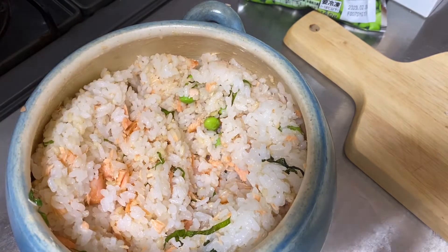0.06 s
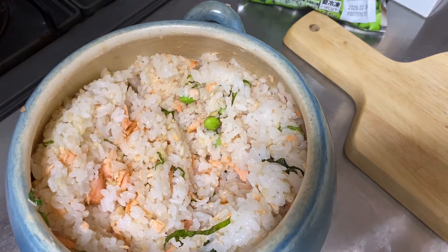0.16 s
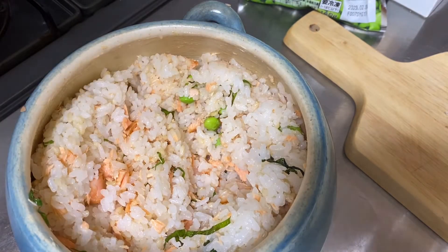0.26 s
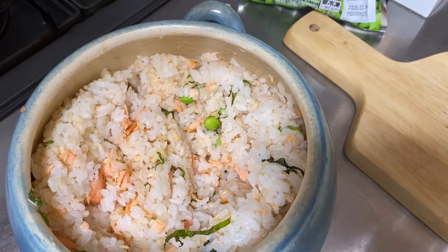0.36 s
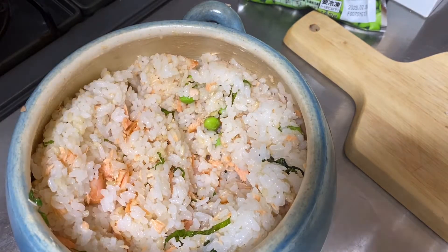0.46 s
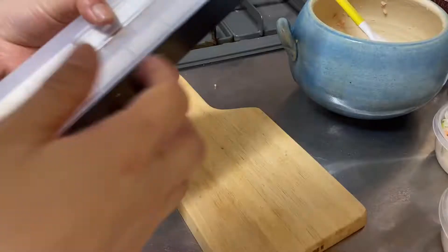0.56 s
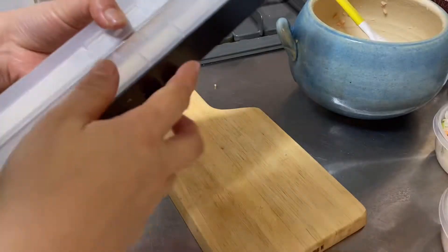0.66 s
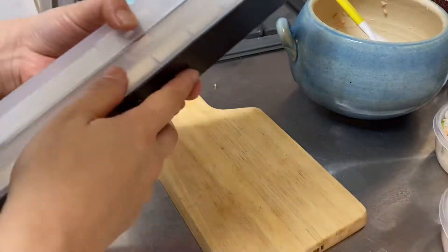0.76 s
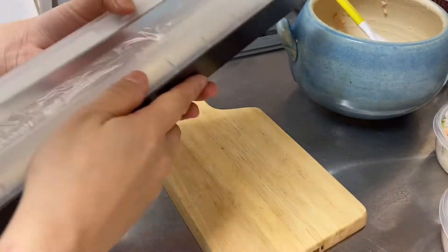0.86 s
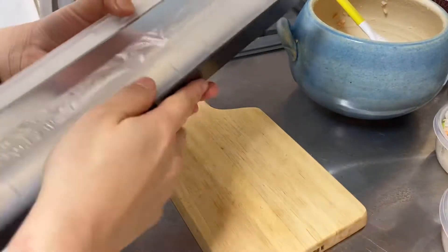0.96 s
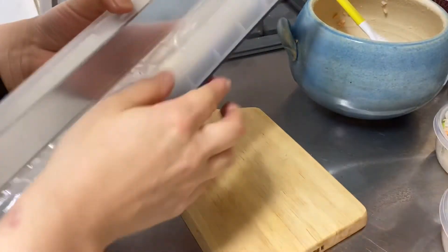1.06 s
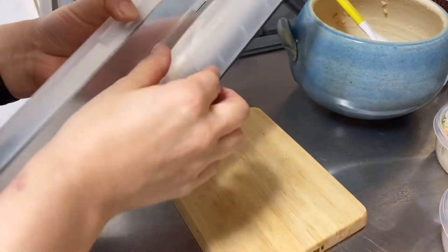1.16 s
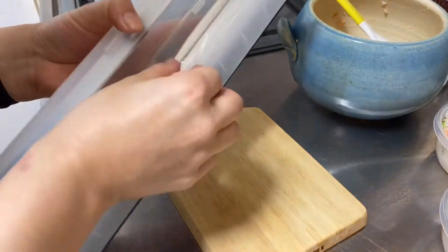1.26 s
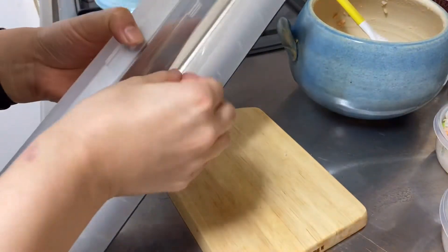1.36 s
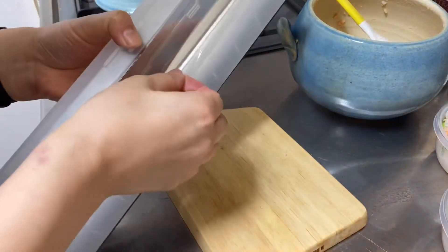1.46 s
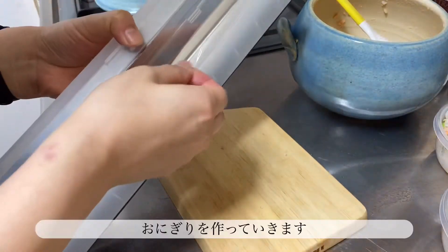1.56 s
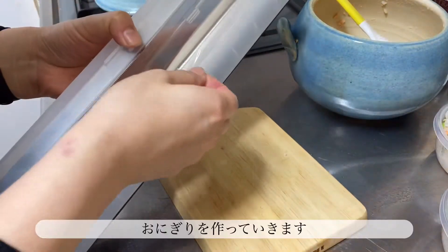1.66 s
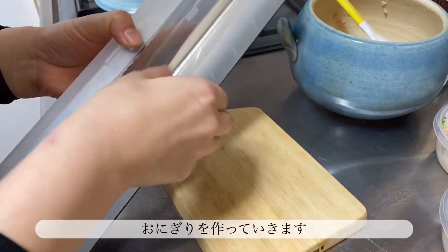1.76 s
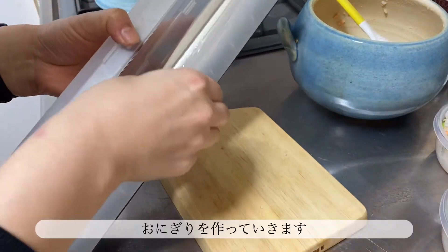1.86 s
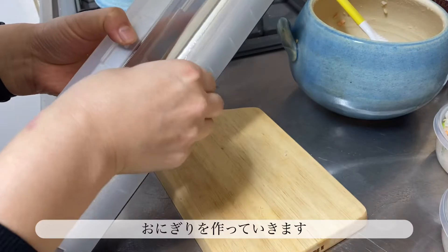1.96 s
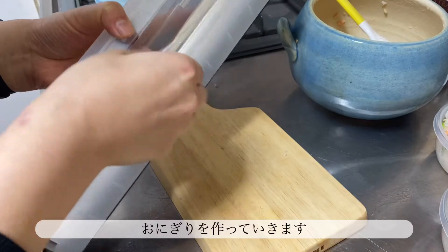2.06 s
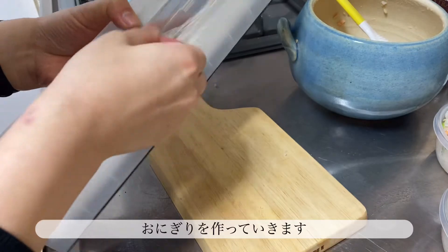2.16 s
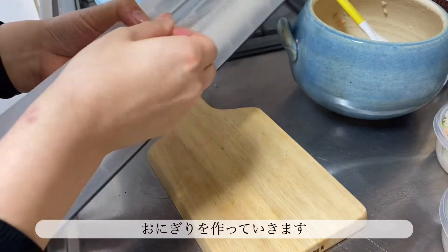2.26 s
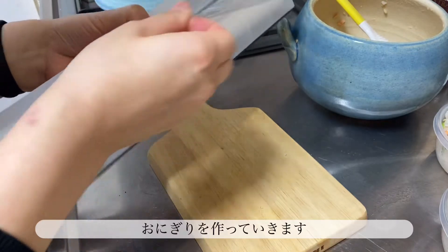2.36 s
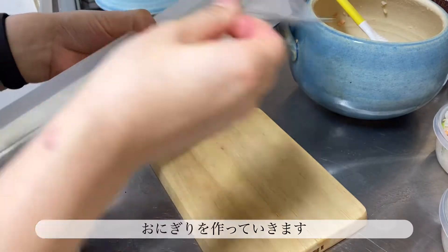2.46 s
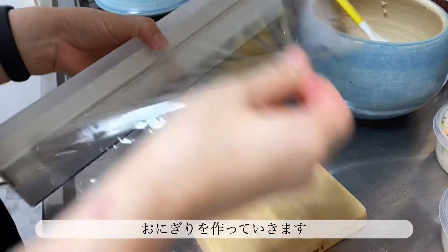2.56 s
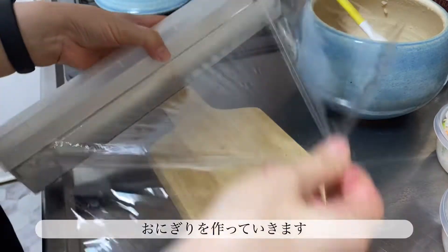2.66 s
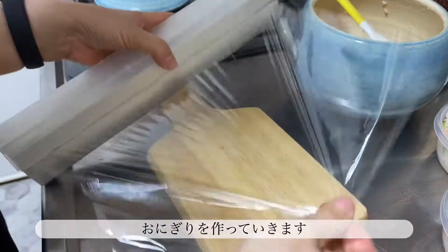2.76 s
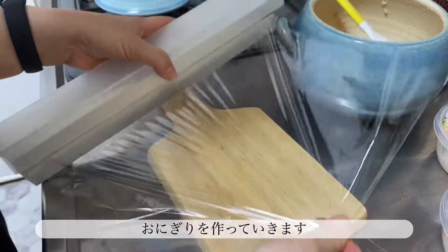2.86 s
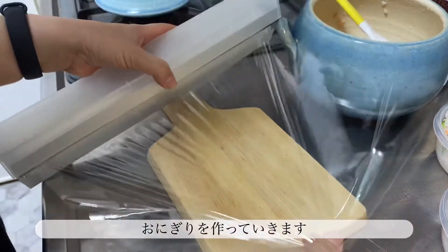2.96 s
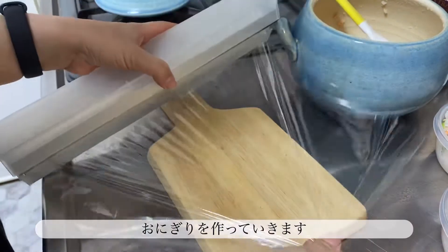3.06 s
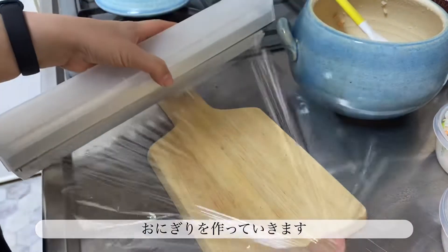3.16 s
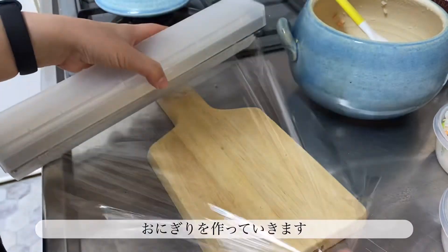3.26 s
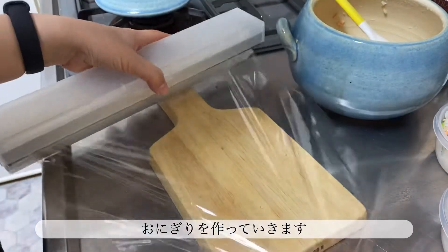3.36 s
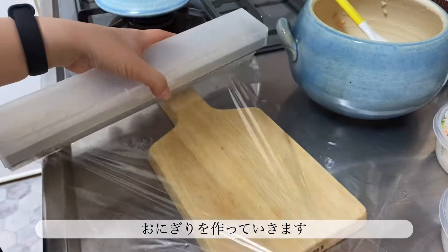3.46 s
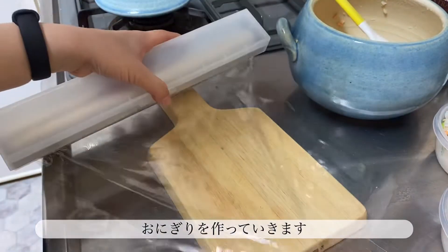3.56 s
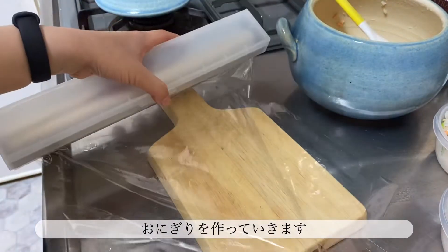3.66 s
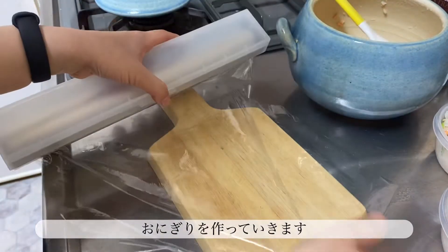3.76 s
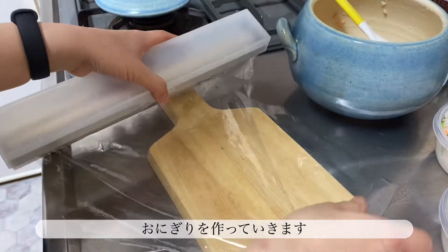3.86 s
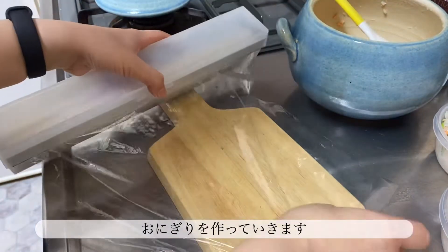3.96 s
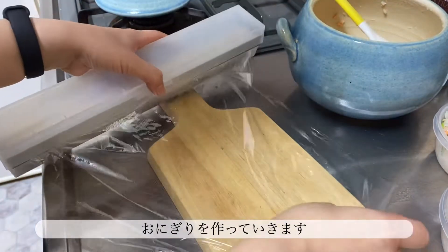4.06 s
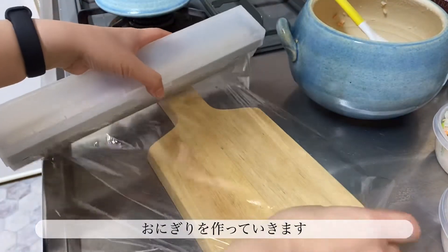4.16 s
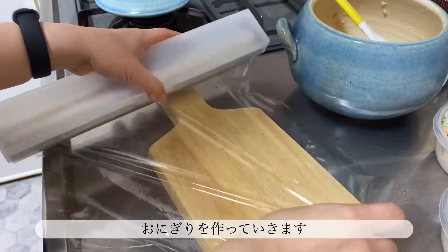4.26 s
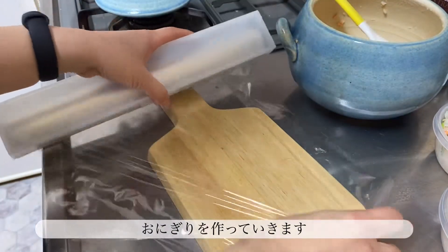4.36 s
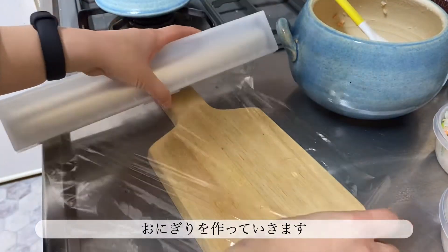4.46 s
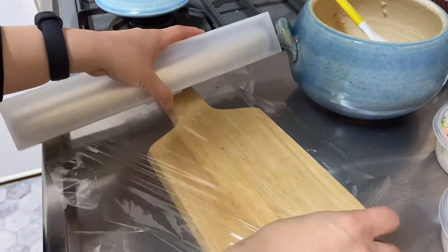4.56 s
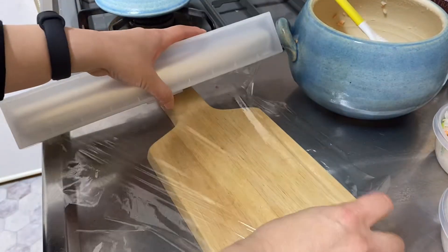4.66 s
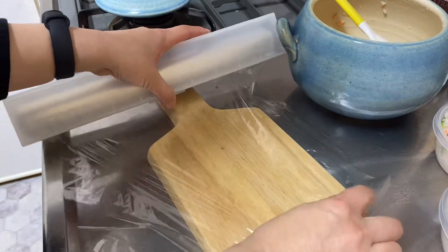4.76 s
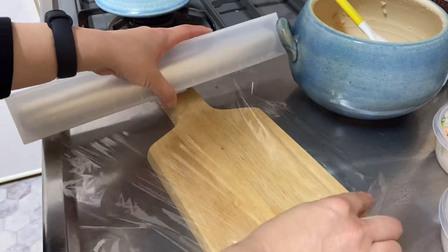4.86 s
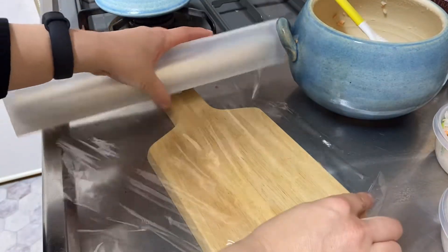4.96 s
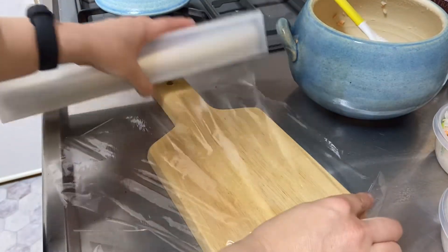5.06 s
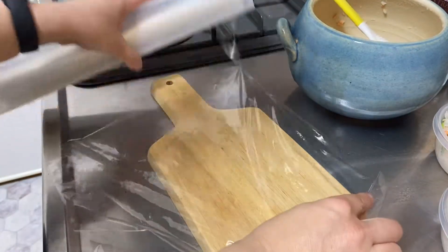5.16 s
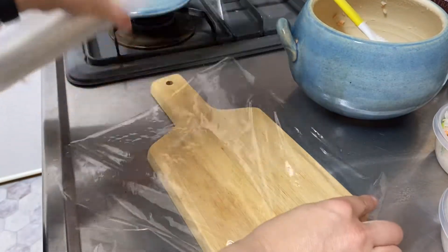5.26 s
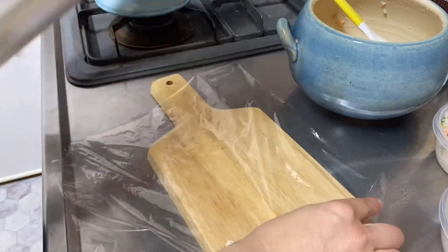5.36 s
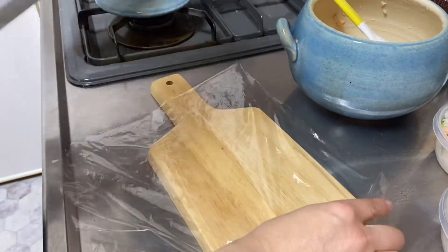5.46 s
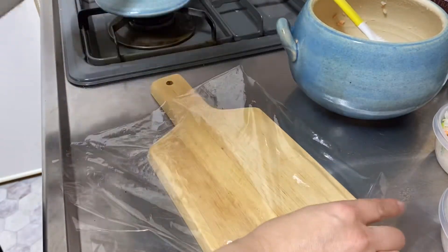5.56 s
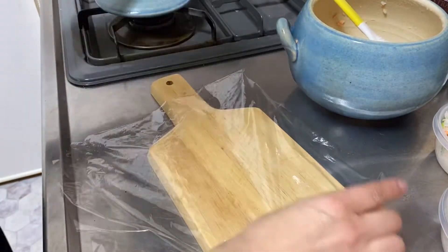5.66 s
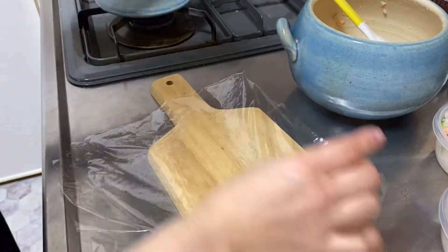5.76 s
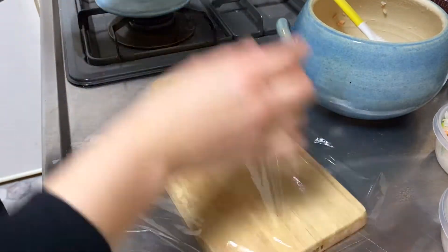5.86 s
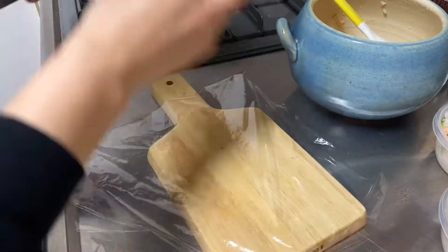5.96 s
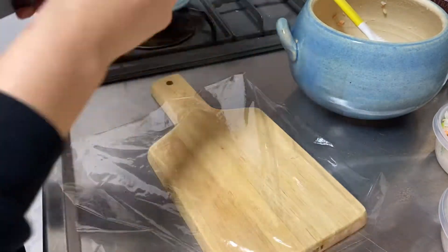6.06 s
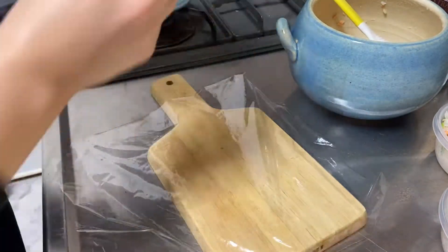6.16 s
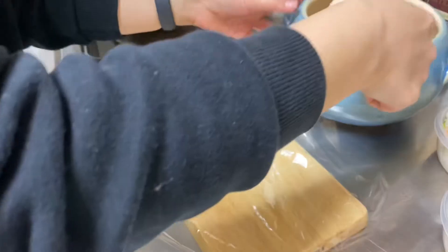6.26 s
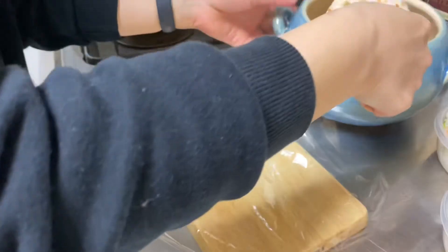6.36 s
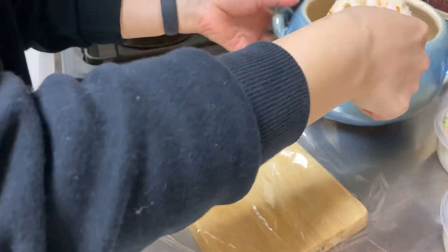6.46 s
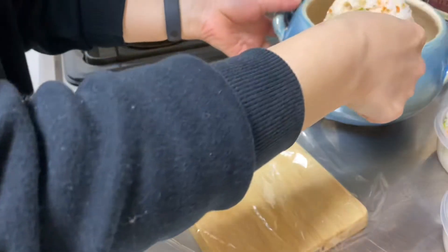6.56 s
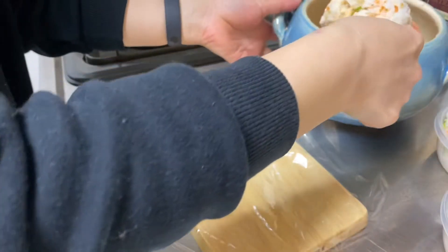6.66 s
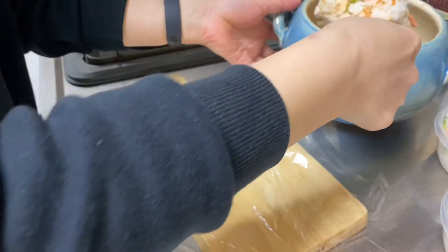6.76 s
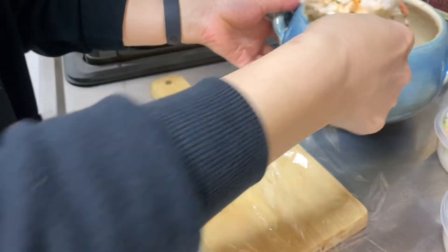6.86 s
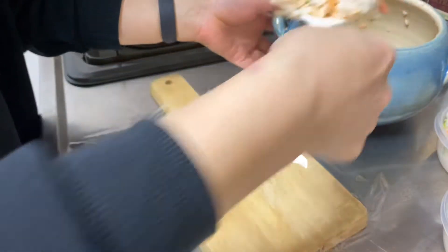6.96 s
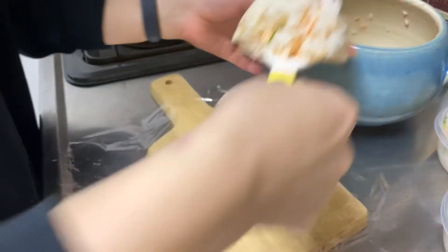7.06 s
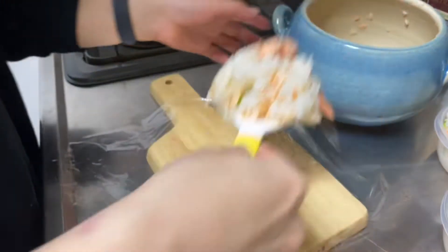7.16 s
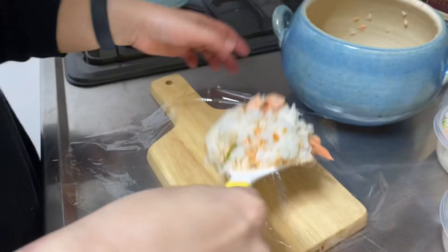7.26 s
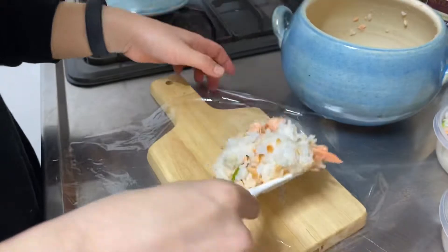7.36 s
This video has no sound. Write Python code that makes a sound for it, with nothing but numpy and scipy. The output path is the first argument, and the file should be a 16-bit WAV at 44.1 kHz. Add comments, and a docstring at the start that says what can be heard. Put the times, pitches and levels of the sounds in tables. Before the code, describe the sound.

Near silence gives way to small plastic ticks and a crisp pluck of cling film. A hollow box rattles with dense knocks while film unrolls, crackling brightly over low thuds on a steel counter. It calms to faint creases, then the film rips off sharply with a thump. The box is put aside, and a utensil lightly touches a pot. Close stereo pickup, short kitchen reflections.

```python
"""Thin plastic film is picked, pulled off its roll in a hollow plastic box, laid on a board and cut off.
Creases in the film rustle in swells, and patches letting go snap as short coloured noise bursts.
The box rings in resonances fed by stick-slip clicks; knocks and thuds are decaying tones with noise;
the steel counter booms low, and a spoon bumps a pot.
Small kitchen with short reflections and a low room tone, taken on a close pair of microphone ports."""
import sys
import numpy as np
from scipy import signal
from scipy.fft import rfft, irfft
from scipy.io import wavfile
from scipy.ndimage import uniform_filter1d

SR = 44100
rng = np.random.default_rng(int(sys.argv[2]) if len(sys.argv) > 2 else 0)


def wav_record(signal):
    """Record a signal, one row per channel, as 16-bit PCM in the file named by sys.argv[1]."""
    frames = np.transpose(np.atleast_2d(signal))
    bounded = np.clip(frames, -1, 1)
    # unit amplitude maps onto the largest positive 16-bit level
    quanta = np.round(bounded * 32767).astype(np.int16)
    wavfile.write(sys.argv[1], SR, quanta)


N = 326340  # samples

# Moves of the film, each a swell, a hold and a fade: start_s, swell_s, hold_s, rustle_db, box_scrape_db
FILM_MOVES = [(0.53, 0.012, 0.16, -84.5, -85), (0.698, 0.023, 0.015, -73, -95),
              (0.761, 0.011, 0.028, -65, -65), (0.915, 0.028, 0.044, -75, -82.5),
              (1.126, 0.049, 0.064, -66, -66), (1.288, 0.006, 0.0067, -58.5, -83),
              (1.327, 0.024, 0.017, -67.5, -66.5), (1.452, 0.016, .02, -84, -69.5),
              (1.537, 0.0085, 0.015, -81, -75), (1.578, 0.0053, 0.0089, -82, -97),
              (1.672, .01, 0.13, -74.5, -71), (1.734, 0.037, .06, -64.5, -63),
              (1.823, .035, 0.0053, -47, -56.5), (1.9, 0.012, 0.18, -58.5, -71),
              (1.967, 0.0062, 0.0027, -41, -50), (2.10, 0.0066, 0.22, -61.5, -60),
              (2.177, 0.16, 0.066, -51, -54.5), (2.325, .06, 0.15, -43, -47),
              (2.5, 0.017, 0.017, -41.5, -49), (2.543, .008, 0.063, -38.5, -42),
              (2.647, 0.0064, 0.08, -40.5, -53.5), (2.699, .01, .1, -53, -61),
              (2.922, 0.015, 0.39, -57, -56.5), (3.082, .05, 0.044, -38.5, -50.5),
              (3.184, 0.029, 0.04, -36, -47.5), (3.272, 0.009, 0.021, -40, -50.5),
              (3.394, 0.015, 0.16, -70, -69), (3.45, 0.087, .01, -47.5, -60.5),
              (3.592, 0.011, 0.15, -79, -93), (3.729, 0.016, 0.013, -57, -62),
              (3.819, 0.023, .07, -64.5, -74), (3.884, 0.0039, 0.066, -62, -74),
              (3.987, 0.066, 0.15, -61.5, -82), (4.217, 0.036, 0.15, -63, -72.5),
              (4.282, 0.022, .06, -66, -70), (4.406, 0.011, .06, -72, -74),
              (4.44, 0.018, 0.059, -82.5, -76), (4.645, 0.028, .06, -72, -77),
              (4.75, 0.017, 0.064, -56, -68.5), (4.832, .01, 0.066, -52.5, -68.5),
              (4.881, 0.048, 0.026, -31, -50.5), (5.019, 0.0082, 0.21, -73.5, -82),
              (5.412, 0.051, 0.021, -72.5, -71.5), (5.58, 0.006, 0.014, -56.5, -51),
              (5.799, 0.057, .01, -64, -65.5), (5.887, 0.0096, 0.04, -84, -92),
              (5.967, 0.0076, 0.028, -77, -88.5), (6.075, 0.01, 0.072, -67.5, -83),
              (7.331, .01, 0.048, -73.5, -74.5)]
# Tone of the rustling film: frequency_hz, relative_level_db
FILM_SPECTRUM = [(880, -29.5), (1500, -5.5), (5420, -2.5), (6970, -4), (8200, -1), (10400, -5.5),
                 (13300, -4), (15200, -5.5), (16100, -17.5), (16800, -60.5)]
# Film letting go of itself: start_s, level_db, centre_hz
FILM_SNAPS = [(0.1734, -46.5, 4900), (1.2999, -29, 2040), (1.5462, -53, 2980), (1.676, -59, 2620),
              (1.8625, -18, 8800), (1.93, -43, 6000), (1.9786, -20.5, 4960), (2.0482, -29.5, 4620),
              (2.148, -31, 8840), (2.1588, -31, 7100), (2.4375, -28, 2040), (2.553, -22, 1900),
              (2.616, -21.5, 1900), (2.6605, -22, 2570), (2.678, -18, 2590), (2.7147, -38, 4180),
              (2.7973, -26, 7500), (2.873, -44.5, 9000), (2.9366, -35.5, 7300), (2.9726, -52, 4900),
              (3.0028, -31, 9300), (3.0226, -25.5, 9900), (3.042, -29, 6900), (3.074, -35, 10700),
              (3.1017, -24, 10300), (3.135, -18.5, 11700), (3.1602, -18.5, 7360), (3.214, -19, 10000),
              (3.237, -25, 7770), (3.2575, -12.5, 9400), (3.3232, -21, 11200), (3.427, -41.5, 8100),
              (3.5472, -27, 11100), (3.683, -43, 11400), (3.747, -63, 6000), (3.893, -38.5, 3700),
              (4.115, -38.5, 10100), (4.1638, -43, 5970), (4.598, -61, 7000), (4.658, -48.5, 8000),
              (4.681, -40.5, 8570), (4.75, -27.5, 11200), (4.7672, -19.5, 7240), (4.7985, -28, 6800),
              (4.8157, -17, 6350), (4.8894, -23, 8000), (4.9203, -16, 10600), (5.133, -42, 10200),
              (5.2111, -40, 10100), (5.4843, -54, 3500), (5.5886, -38.5, 2745), (5.9702, -37.5, 11160),
              (6.085, -45, 11500), (6.7409, -62, 4320), (7.3486, -47, 2760)]
# Resonances of the hollow box: frequency_hz, width_hz, relative_level_db
BOX_MODES = [(449, 94, -2.5), (630, 220, -9.5), (861, 110, 5), (1010, 530, 4), (1200, 600, 1),
             (1600, 980, -20.5), (1850, 280, -8.5)]
# Weight of the hands: time_s, box_drum_db, counter_shake_db
HAND_WEIGHT = [(0.0, -75.5, -63.5), (.3, -90.5, -73), (.6, -78.5, -65), (1.1, -81.5, -78.5),
               (1.3, -68.5, -68), (1.55, -82, -79), (1.8, -75, -80), (2.06, -72.5, -60.5),
               (2.31, -56.5, -52), (2.6, -42.5, -45), (2.78, -55.5, -47.5), (2.92, -70.5, -61),
               (3.17, -46.5, -55), (3.38, -55, -53), (3.57, -78, -61.5), (4.1, -73, -68.5),
               (4.24, -61, -58.5), (4.53, -69, -61), (4.79, -69, -64.5), (5.0, -43, -39.5),
               (5.19, -67, -57), (5.36, -78.5, -71.5), (5.7, -66.5, -64), (6.3, -85.5, -74.5),
               (6.58, -76, -59), (6.75, -87.5, -75), (7.4, -84, -69)]
# Blows on box, board and pot: start_s, level_db, pitch_hz, ring_t60_s, edge_db (edge relative to the blow)
BLOWS = [(0.175, -57.5, 1865, 0.035, 8), (0.483, -69, 1300, 0.017, -2.5), (0.718, -55.5, 422, 0.15, -20),
         (0.781, -36.5, 899, 0.15, -9), (1.301, -45, 1170, 0.021, 13), (1.561, -52, 1180, 0.017, -3),
         (1.587, -52.5, 1190, 0.021, 1), (1.679, -60.5, 430, 0.022, 5.5), (1.833, -47, 288, 0.016, 1.5),
         (2.05, -51.5, 1200, 0.14, 16), (2.108, -39.5, 1012, .03, -18), (2.111, -41.5, 393, 0.09, -25),
         (2.124, -35, 462, 0.096, -5), (2.186, -34.5, 336, 0.031, -25), (2.209, -32.5, 467, 0.15, -30),
         (2.235, -30, 462, 0.068, -8.5), (2.382, -33.5, 820, 0.061, 3), (2.439, -17, 513, 0.029, 6.5),
         (2.525, -24, 445, 0.028, -1.5), (2.555, -19, 506, 0.054, 6.5), (2.59, -13.5, 430, 0.016, -13),
         (2.616, -21.5, 464, 0.015, 6), (2.663, -26, 925, 0.027, -0.5), (2.683, -20.5, 485, 0.079, -1),
         (2.72, -26, 595, 0.041, 0.5), (2.782, -31, 960, 0.019, -24), (2.937, -39.5, 861, 0.019, 4.5),
         (2.997, -27, 387, 0.015, -11), (3.162, -31.5, 868, 0.079, 2), (3.243, -28.5, 1040, 0.012, -7),
         (3.331, -24.5, 840, 0.023, -5.5), (3.531, -30, 464, 0.0071, -6), (3.788, -25.5, 800, 0.0256, -5.5),
         (4.329, -41.5, 416, 0.065, -10), (4.444, -51, 763, 0.026, 2.5), (4.805, -25, 590, 0.039, -20),
         (4.889, -38.5, 840, 0.017, -15), (4.926, -25.5, 406, 0.084, -14), (4.957, -13.5, 824, 0.056, -40),
         (5.044, -34, 381, 0.051, -36.5), (5.589, -29.5, 799, 0.12, -29), (5.614, -18.5, 440, 0.074, -14.5),
         (5.864, -49.5, 763, 0.032, -4.5), (6.473, -39, 433.4, 0.049, -12.5),
         (6.509, -45.5, 405, 0.045, -30), (6.529, -47, 616, 0.06, -34), (6.548, -68, 442.6, 0.056, -20),
         (7.35, -42, 446, 0.026, 0.5)]
# Resonances of the steel counter: frequency_hz, width_hz, relative_level_db
COUNTER_MODES = [(68, 75, -0.5), (135, 34, 7.5), (202, 68, 1), (302, 140, -2.5)]
# Blows that reach the counter: start_s, level_db, pitch_hz, ring_t60_s
COUNTER_BLOWS = [(1.831, -23, 181, 0.035), (2.125, -34, 150.8, 0.03), (2.322, -40, 80.7, 0.11),
                 (2.677, -25.5, 172.6, 0.17), (2.719, -30.5, 114.2, 0.068), (2.961, -42.5, 135, 0.2),
                 (3.145, -35, 192, 0.025), (3.327, -24, 159.3, 0.028), (3.358, -33.5, 82.4, 0.25),
                 (3.789, -42.5, 179, 0.071), (4.179, -41.5, 169.4, 0.029), (4.962, -39, 117.7, 0.28),
                 (4.999, -34.5, 186.3, 0.48), (5.056, -35, 231.7, 0.19), (5.608, -60, 277, 0.11),
                 (6.474, -48.5, 162, 0.21), (6.506, -41.5, 149.6, 0.4), (7.347, -46, 146, 0.068)]
# Decay of the kitchen's reflections: frequency_hz, t60_s
KITCHEN_DECAY = [(100, 0.37), (450, 0.26), (1000, 0.18), (4000, 0.19), (12000, 0.033)]
# Filter on the reflections, roughly reflected over direct: frequency_hz, level_db
REFLECTED_LEVEL = [(100, -5), (300, 1.5), (600, -1.5), (1500, 2.5), (4000, -6), (12000, -3.5)]
# Phase by which the left port leads the right: frequency_hz, lead_rad
PORT_LEAD = [(0, 0), (860, 0.8), (2070, 0.4), (3190, 1.3), (6370, -0.4), (6980, 0.2), (8010, -3.3),
             (8870, -3.7), (10400, -6.2), (11600, -6.6), (12800, -9.4), (14100, -9.7), (15200, -12.6),
             (16500, -12.3)]
# Level of the left port over the right: frequency_hz, difference_db
PORT_TILT = [(60, -3.5), (180, -3.5), (550, 1.0), (1650, 0.5), (4970, 1.0), (15000, 0.0)]
# Tone of the empty room: frequency_hz, relative_level_db
ROOM_SPECTRUM = [(15, -40), (25, -12), (48, 0), (117, -8), (153, 2), (206, -14), (236, -11), (309, -20),
                 (840, -35), (2110, -41), (4500, -42), (6300, -43), (8000, -48), (10100, -46), (16000, -58)]
# Likeness of the room tone at the two ports: frequency_hz, likeness (0 unrelated, 1 identical)
ROOM_LIKENESS = [(60, 0.09), (290, 0.12), (640, .05), (15000, .05)]

# a move swells out of this depth; its rustle and its scrape die at these speeds
SWELL_DB, RUSTLE_FADE_DB_PER_S, SCRAPE_FADE_DB_PER_S = 27, 293, 151
SETTLE_DB, SETTLE_DB_PER_S = -21, 106.5  # the released film goes on settling, faint and slower to die
SNAP_TOP_DB = -12  # bright top of every snap, relative to its patch
ROUNDS_PER_S = 1.7  # rounds through the three sets of reflections
ROOM_TONE_DB = -65  # rms
BASS_CUT_HZ, UPPER_EDGE_HZ = 48, 16500


def film():
    """Countless small creases flip; each moves a short puff of air."""
    t = np.arange(200) / SR
    flips = slips(per_s=5100, spread_db=7.0, smooth=0.69, clump_db=2.5)
    kind = rng.integers(0, 8, N)
    creases = np.zeros(N)
    for k in range(8):
        puff = rng.standard_normal(200) * gain_of(-60 * t / 0.0066)
        creases += signal.oaconvolve(flips * (kind == k), puff)[:N]
    rustle = unit_rms(shaped(creases, FILM_SPECTRUM))
    return moves(column=3, fade_db_per_s=RUSTLE_FADE_DB_PER_S) * rustle


def snaps():
    """A sharp crack, coloured by the size of the patch, with a bright top and a dying crackle."""
    out, t = np.zeros(N), np.arange(2500) / SR
    crack_and_crackle = gain_of(-60 * t / 0.0035) + 0.061 * gain_of(-60 * t / 0.0096)
    for start_s, level_db, centre_hz in FILM_SNAPS:
        burst = rng.standard_normal(len(t)) * crack_and_crackle
        mode = [(centre_hz, 0.63 * centre_hz, 0)]
        patch = unit_peak(ring(ring(burst, mode), mode))
        top = unit_peak(band(burst, 7200, 14000))
        add(out, start_s, gain_of(level_db) * (patch + gain_of(SNAP_TOP_DB) * top))
    return out


def box():
    """The turning roll drums the low modes of the hollow box; fingers and film scrape the high ones."""
    drum = band(slips(per_s=700, spread_db=3, smooth=0.74, clump_db=3.5), 260, 900)
    scrape = band(slips(per_s=1700, spread_db=2, smooth=1.0, clump_db=5.5), 1100, 3600)
    drummed = hands(column=1) * unit_rms(ring(drum, BOX_MODES))
    scrape_gain = moves(column=4, fade_db_per_s=SCRAPE_FADE_DB_PER_S)
    return drummed + scrape_gain * unit_rms(ring(scrape, BOX_MODES))


def knocks():
    """The struck spot rings at its own pitch, the box joins in, and the contact edge ticks."""
    out, t = np.zeros(N), np.arange(8000) / SR
    onset = 1 - np.exp(-t / 0.00021)
    body_fall = gain_of(-60 * t / 0.02)
    edge_fall = gain_of(-60 * t / 0.0041) + 0.048 * gain_of(-60 * t / 0.17)
    for start_s, level_db, pitch_hz, t60_s, edge_db in BLOWS:
        grain = rng.standard_normal(len(t))
        # a loose grip lets the parts chatter, which roughens the ring
        chatter = unit_rms(band(grain, 0.36 * pitch_hz, 2.1 * pitch_hz))
        tone = np.sin(2 * np.pi * pitch_hz * t)
        spot = (tone + 0.23 * chatter) * gain_of(-60 * t / t60_s) * onset
        body = unit_peak(ring(band(grain * body_fall, 240, 950), BOX_MODES))
        edge = unit_peak(band(grain * edge_fall, 1300, 3000))
        blow = unit_peak(spot + 0.87 * body) + gain_of(edge_db) * edge
        add(out, start_s, gain_of(level_db) * blow)
    return out


def counter():
    """The steel counter booms under hands and box."""
    shake = band(slips(per_s=200, spread_db=2.5, smooth=0.8, clump_db=1.5), 45, 380)
    return hands(column=2) * unit_rms(ring(shake, COUNTER_MODES))


def thuds():
    """A soft low swing that builds in a few milliseconds and rattles on."""
    out, t = np.zeros(N), np.arange(16000) / SR
    onset = 1 - np.exp(-t / 0.0026)
    for start_s, level_db, pitch_hz, t60_s in COUNTER_BLOWS:
        rattle = unit_rms(band(rng.standard_normal(len(t)), 0.8 * pitch_hz, 2.6 * pitch_hz))
        tone = np.sin(2 * np.pi * pitch_hz * t)
        swing = (tone + 0.28 * rattle) * gain_of(-60 * t / t60_s) * onset
        add(out, start_s, gain_of(level_db) * unit_peak(swing))
    return out


def moves(column, fade_db_per_s):
    """Swell, hold, fade and settling of every move of the film, added as power, returned as a gain."""
    power, t = np.zeros(N), np.arange(SR) / SR
    for row in FILM_MOVES:
        start_s, swell_s, hold_s = row[:3]
        swell_db = np.minimum(SWELL_DB * (t / swell_s - 1), 0)
        after_s = np.maximum(t - swell_s - hold_s, 0)
        fade = gain_of(-fade_db_per_s * after_s) + gain_of(SETTLE_DB - SETTLE_DB_PER_S * after_s)
        add(power, start_s, (gain_of(row[column] + swell_db) * fade) ** 2)
    return np.sqrt(power)


def hands(column):
    """One effect of the weight of the hands as a gain for every sample."""
    rows = np.transpose(HAND_WEIGHT)
    return gain_of(np.interp(np.arange(N) / SR, rows[0], rows[column]))


def slips(per_s, spread_db, smooth, clump_db):
    """Stick-slip clicks, a few large, over a smooth share of noise, all coming in clumps."""
    size = gain_of(spread_db * np.minimum(rng.exponential(1, N), 5))
    size = size * (rng.random(N) < per_s / SR)
    clicks = unit_rms(size * rng.choice([-1., 1.], N)) + smooth * rng.standard_normal(N)
    clumps = unit_rms(uniform_filter1d(uniform_filter1d(rng.standard_normal(N), 500), 500))
    return unit_rms(clicks * gain_of(clump_db * clumps))


def ring(x, modes):
    """Passes x through resonances of (Hz, width Hz, dB); neighbours swing in opposite sense."""
    out = 0
    for k, (hz, width_hz, db) in enumerate(modes):
        pole = np.exp((2j * np.pi * hz - np.pi * width_hz) / SR)
        mode = 2 * signal.lfilter([1 - abs(pole)], [1, -pole], x).real
        out = out + (-1) ** k * gain_of(db) * mode
    return out


def ports(x):
    """The direct sound reaches the two ports with a phase and level difference."""
    hz = np.fft.rfftfreq(N, 1 / SR)
    lead = np.interp(hz, *np.transpose(PORT_LEAD))
    side = np.array([[0.5], [-0.5]])  # left, right: half the difference each
    return irfft(rfft(x) * np.exp(1j * side * lead) * gain_of(side * curve(PORT_TILT, hz)), N)


def kitchen(x):
    """The reflections fade steadily round among three sets, which evens out their colour."""
    turn = 2 * np.pi * (ROUNDS_PER_S * np.arange(N) / SR + np.arange(3)[:, None] / 3)
    shares = np.sqrt((1 + np.cos(turn)) / 3)  # their powers always sum to 1
    wet = np.zeros((2, N))
    for share in shares:
        wet += signal.fftconvolve((x * share)[None], reflections(), axes=1)[:, :N]
    return shaped(wet, REFLECTED_LEVEL)


def reflections():
    """Sparse reflections of random sign, other ones at each port, each band dying at its own speed."""
    taps = np.zeros((2, SR // 2))
    at = np.arange(60, SR // 2 - 20, 20)
    at = at + rng.integers(0, 20, (2, len(at)))
    np.put_along_axis(taps, at, rng.choice([-1., 1.], at.shape), 1)
    hz, t, z = signal.stft(taps, SR, nperseg=256)
    t60_s = curve(KITCHEN_DECAY, hz)[:, None]
    # counter and board throw back strong near echoes ahead of the room tail
    fall = gain_of(-60 * t / t60_s) + 2.2 * gain_of(-60 * t / 0.018)
    fall = fall / np.sqrt((fall ** 2).sum(1, keepdims=True))
    tail = signal.istft(z * fall, SR, nperseg=256)[1]
    tail = tail * (np.arange(z.shape[2] * 128 - 128) > 60)  # silent ahead of the first reflection
    tail = tail / np.linalg.norm(tail, axis=1, keepdims=True)
    # long waves arrive more alike at both ports
    middle = tail.mean(0)
    apart = tail - middle
    return middle + 0.3 * apart + 0.7 * band(apart, 420, 18000)


def room_tone():
    """Low household rumble and faint hiss in drifting patches, partly alike at the two ports."""
    frames, hz = N // 256 + 5, np.fft.rfftfreq(1024, 1 / SR)
    a, b, c, d, patches = rng.standard_normal((frames, 513, 5)).T
    patches = unit_rms(uniform_filter1d(uniform_filter1d(patches, 8, 0), 12, 1))  # over frequency, then time
    same = np.clip(curve(ROOM_LIKENESS, hz), -1, 1)[:, None]
    left = a + 1j * b
    right = same * left + np.sqrt(1 - same ** 2) * (c + 1j * d)
    z = np.array([left, right]) * gain_of(curve(ROOM_SPECTRUM, hz)[:, None] + 0.9 * patches)
    tone = signal.istft(z, nperseg=1024, noverlap=768)[1][:, :N]
    return gain_of(ROOM_TONE_DB) * unit_rms(tone)


def gain_of(db):
    """Decibels to a factor."""
    return 10 ** (np.asarray(db) / 20)


def unit_rms(x):
    """Scales to rms 1."""
    return x / np.sqrt(np.mean(x ** 2) + 1e-20)


def unit_peak(x):
    """Scales to peak 1."""
    return x / abs(x).max()


def curve(points, hz):
    """Reads a table by frequency at hz, on a logarithmic frequency scale."""
    f, value = np.transpose(points)
    return np.interp(np.log(hz + 1), np.log(f + 1), value)


def shaped(x, points):
    """Filters by a (Hz, dB) table."""
    gain = gain_of(curve(points, np.fft.rfftfreq(x.shape[-1], 1 / SR)))
    return irfft(rfft(x) * gain, x.shape[-1])


def band(x, low_hz, high_hz):
    """Steep band-pass."""
    return signal.sosfilt(signal.butter(3, [low_hz, high_hz], "band", fs=SR, output="sos"), x)


def add(mix, start_s, sound):
    """Places a sound at its moment, cut at the end of the mix."""
    part = mix[round(start_s * SR):][:len(sound)]
    part += sound[:len(part)]


def scene():
    """All sources, direct and reflected, over the room tone."""
    near = film() + snaps() + box() + knocks() + counter() + thuds()
    return ports(near) + kitchen(near) + room_tone()


def record(dry):
    """The bass cut of the microphone and the band limit of the recorder."""
    thinned = signal.sosfilt(signal.butter(3, BASS_CUT_HZ, "high", fs=SR, output="sos"), dry)
    low_pass = signal.firwin(511, UPPER_EDGE_HZ, window=("kaiser", 9), fs=SR)
    return signal.oaconvolve(thinned, low_pass[None], "same")


dry = scene()
out = record(dry)
wav_record(out)
```